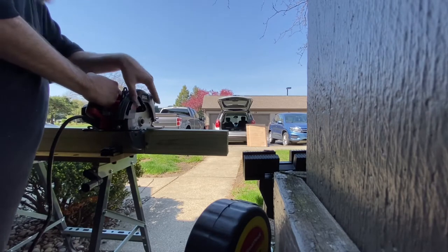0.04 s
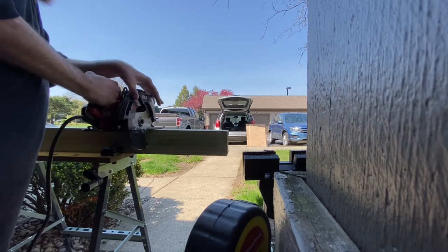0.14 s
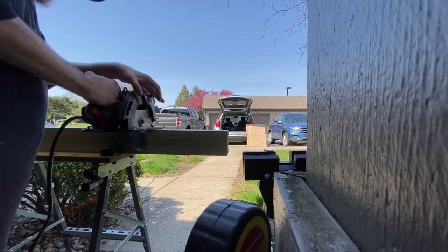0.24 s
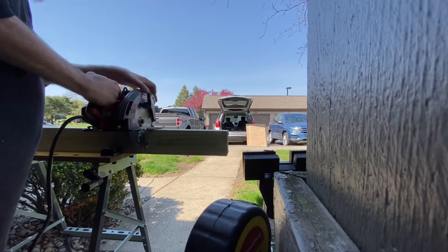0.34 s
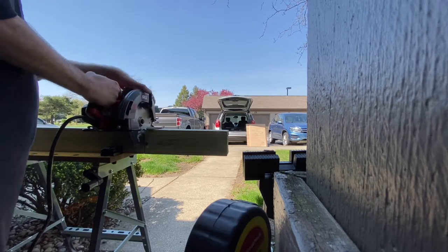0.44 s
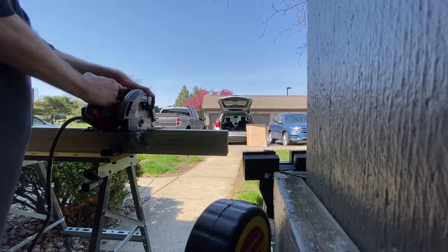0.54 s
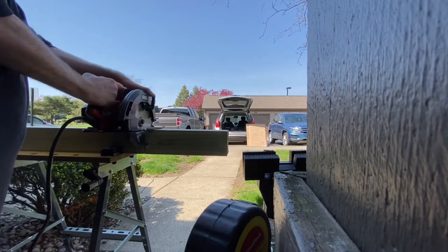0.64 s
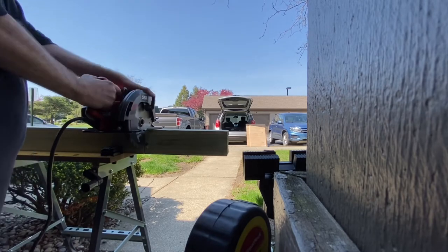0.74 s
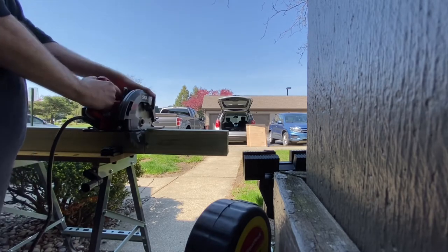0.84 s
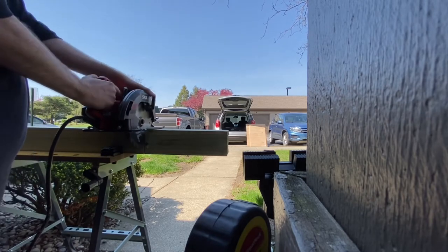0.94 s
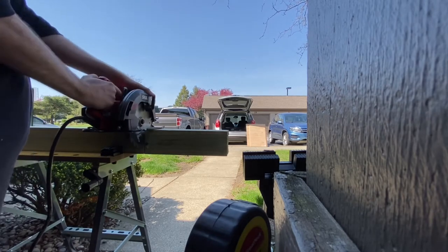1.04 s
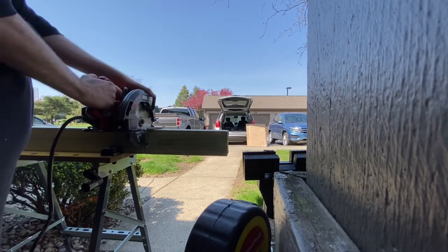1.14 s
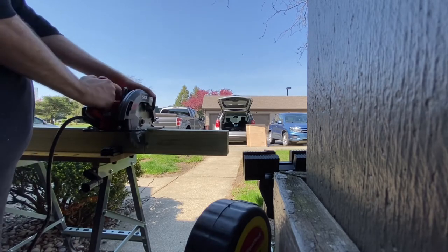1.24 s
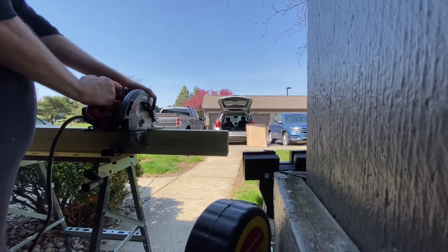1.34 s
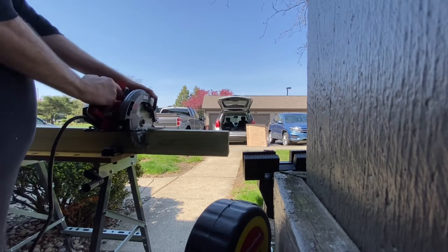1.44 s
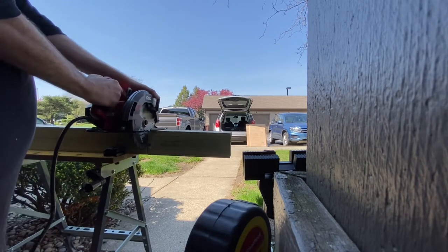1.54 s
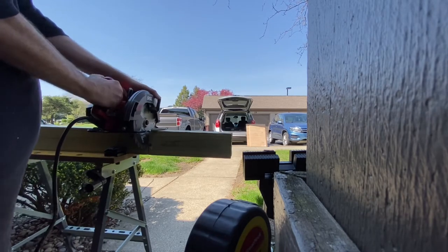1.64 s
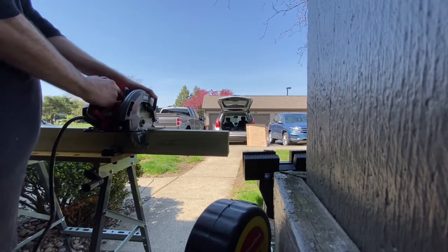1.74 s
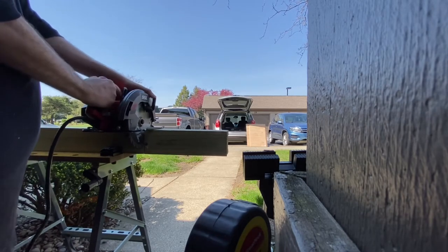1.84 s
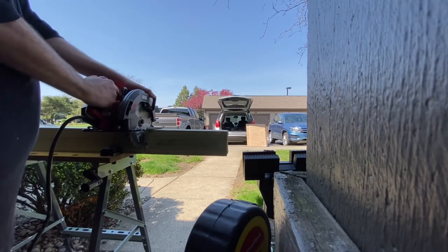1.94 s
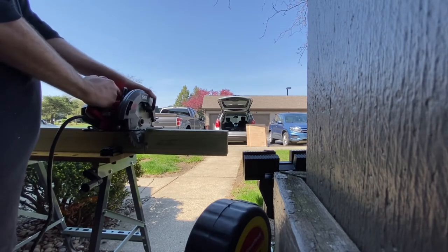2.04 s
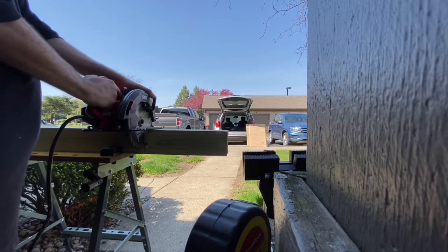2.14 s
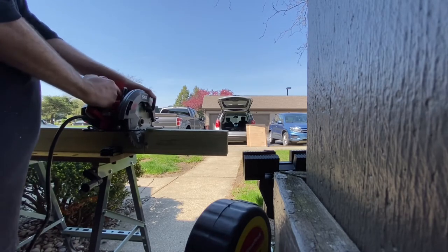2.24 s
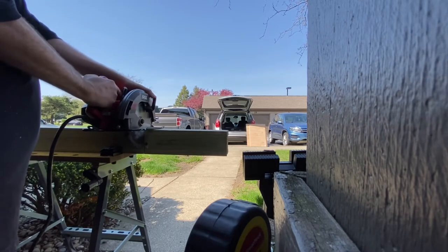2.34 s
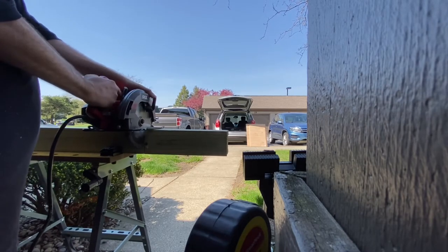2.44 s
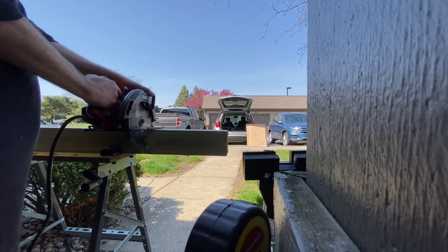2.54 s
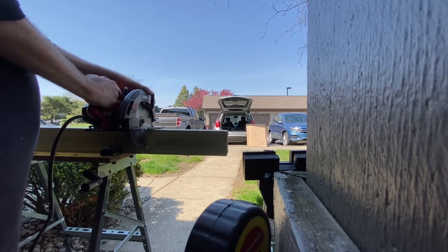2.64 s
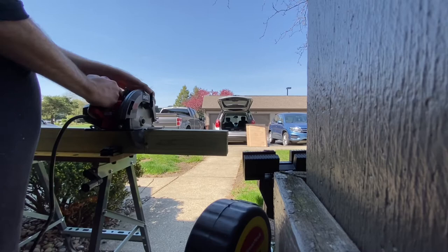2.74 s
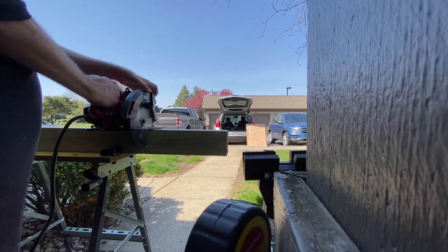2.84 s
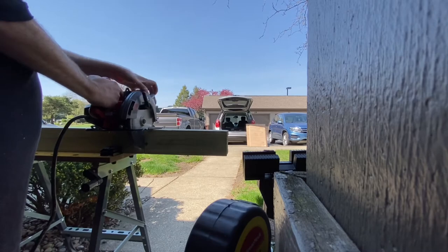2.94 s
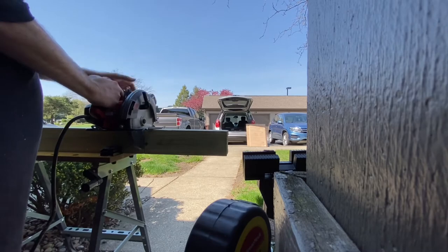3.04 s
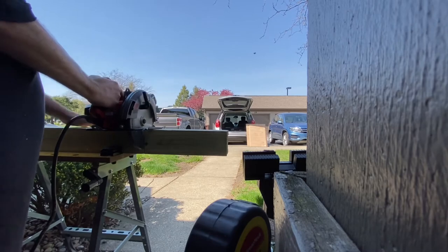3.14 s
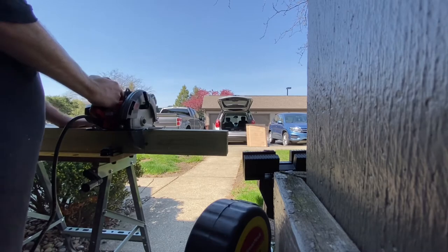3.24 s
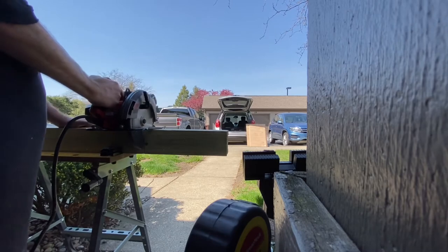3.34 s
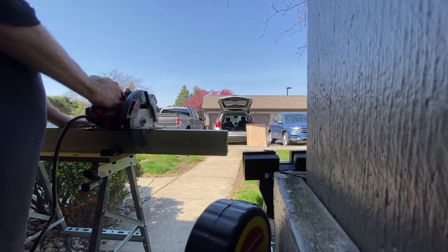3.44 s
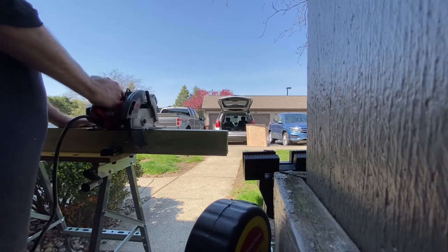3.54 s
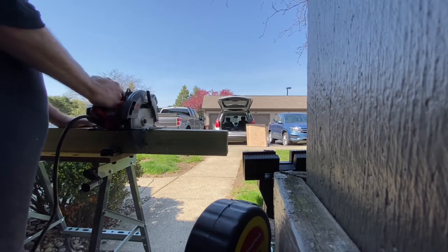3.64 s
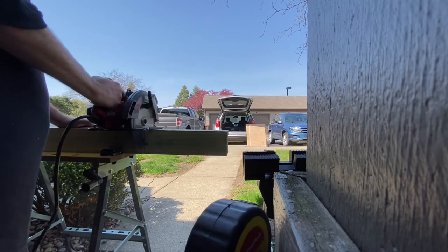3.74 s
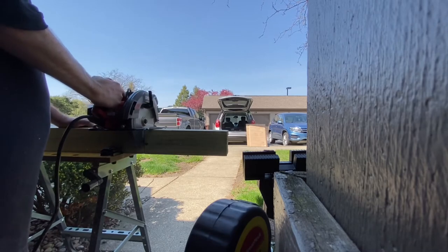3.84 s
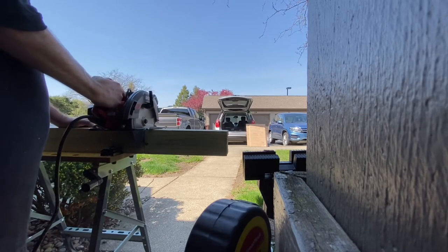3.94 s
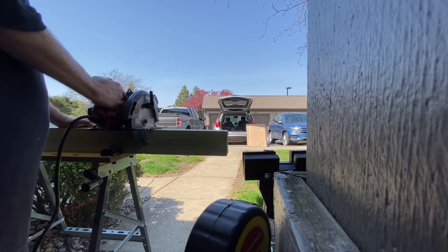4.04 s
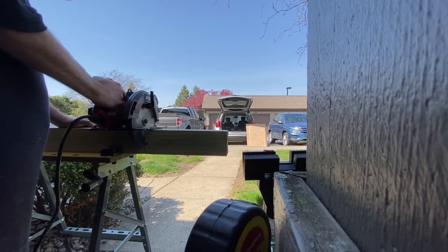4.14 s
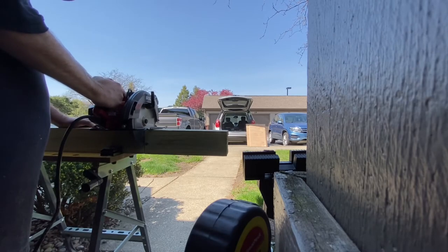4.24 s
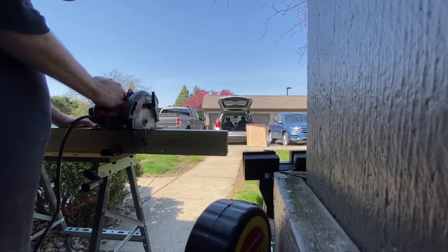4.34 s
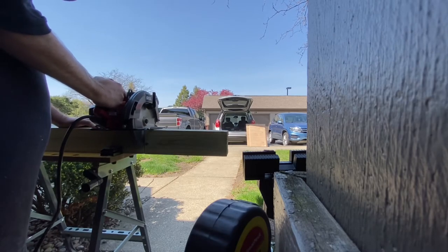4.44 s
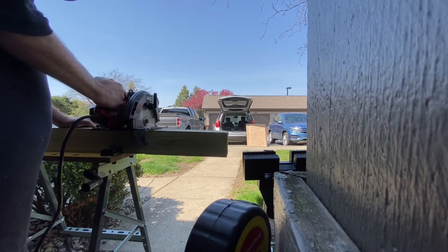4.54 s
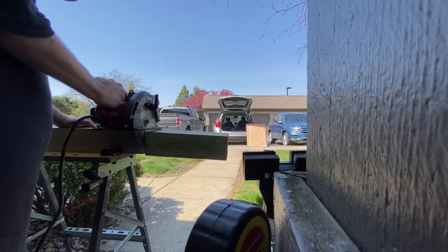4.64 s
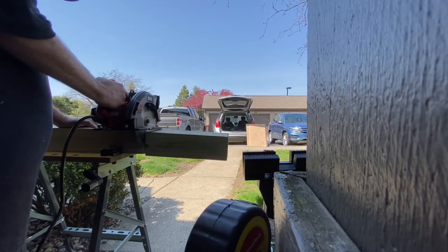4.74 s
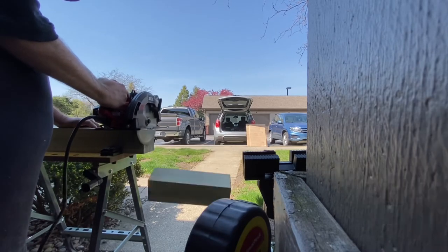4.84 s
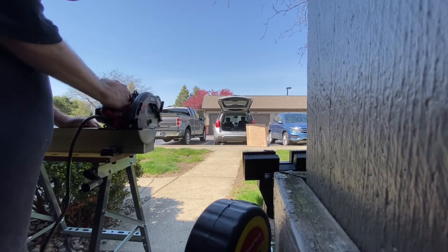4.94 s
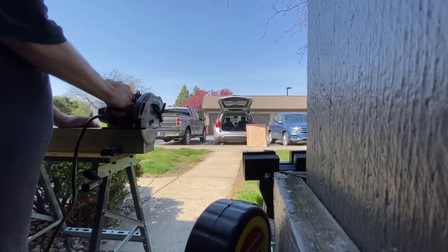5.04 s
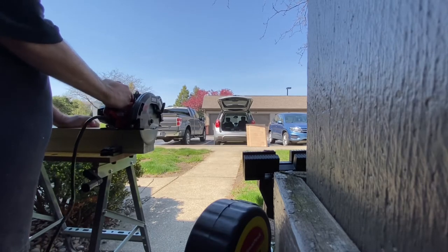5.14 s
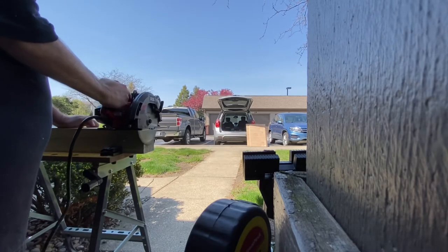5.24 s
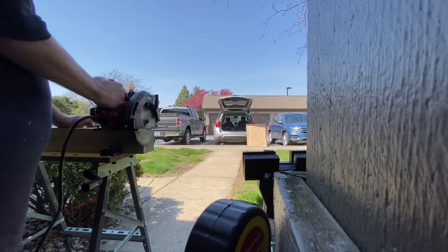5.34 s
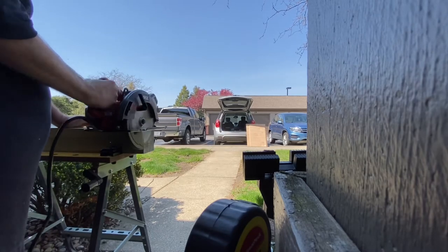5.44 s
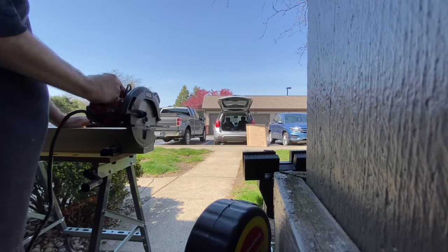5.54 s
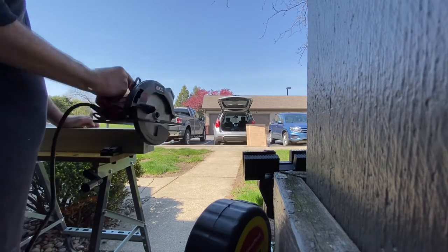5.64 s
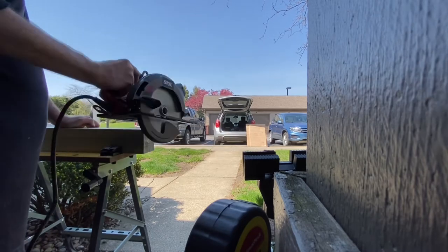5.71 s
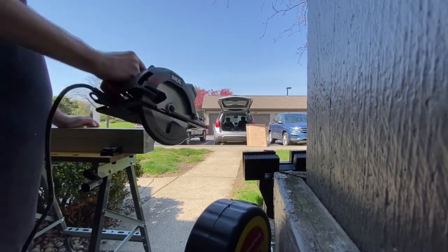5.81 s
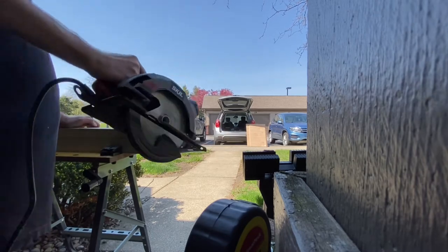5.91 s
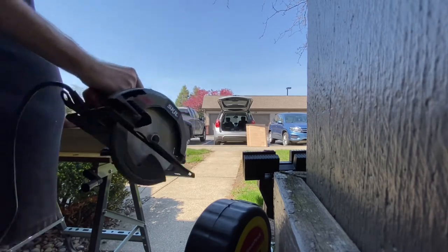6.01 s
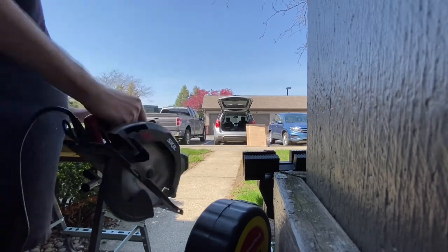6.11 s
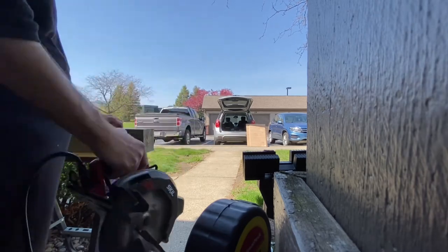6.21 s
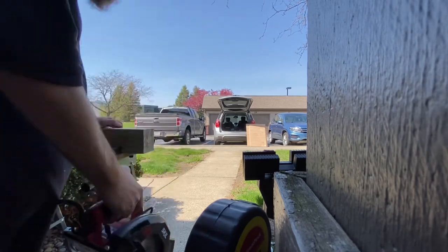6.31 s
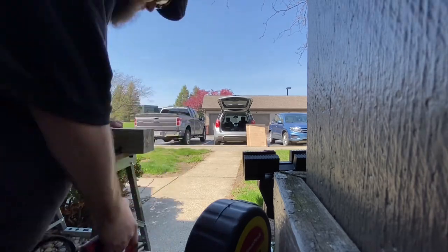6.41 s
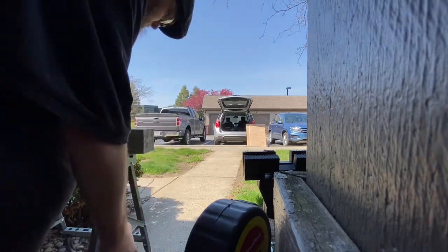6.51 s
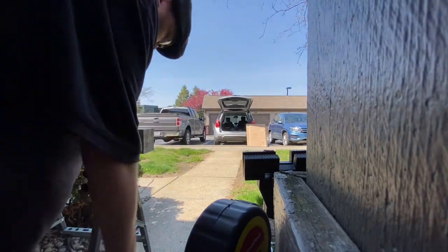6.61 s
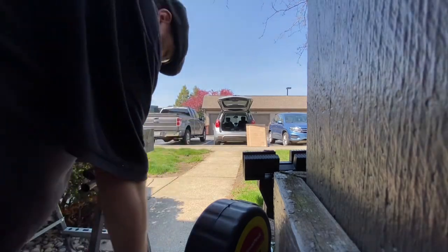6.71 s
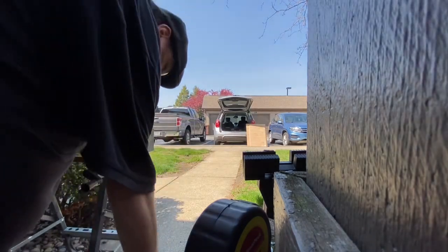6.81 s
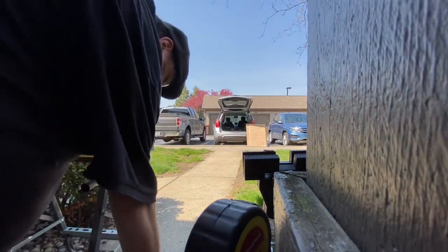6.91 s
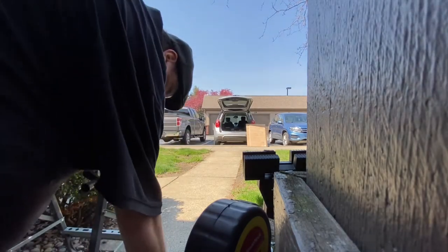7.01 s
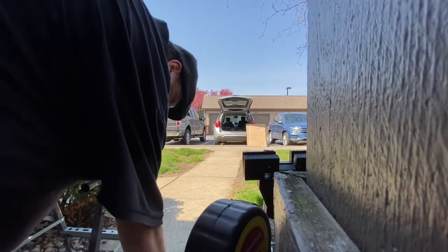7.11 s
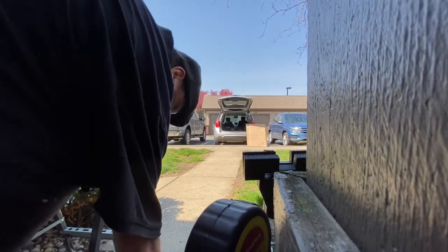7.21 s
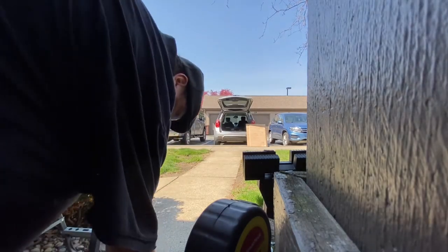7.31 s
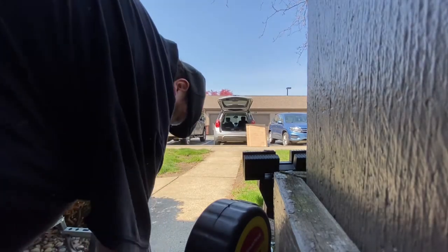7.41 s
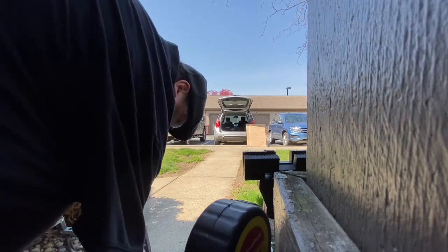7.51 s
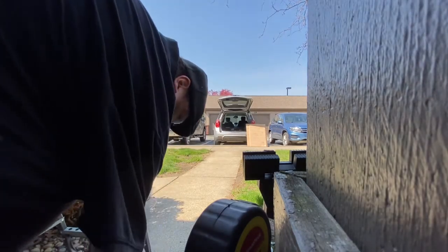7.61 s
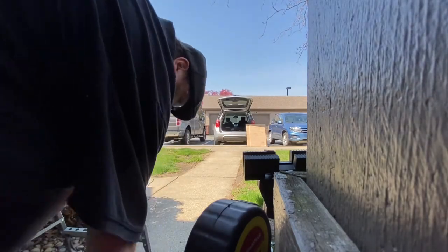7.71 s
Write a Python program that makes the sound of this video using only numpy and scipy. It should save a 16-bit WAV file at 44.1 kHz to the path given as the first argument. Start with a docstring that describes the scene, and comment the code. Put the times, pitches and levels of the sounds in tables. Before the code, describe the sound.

Outside beside a wall, soft distant traffic and a faint machine hum, with two tiny knocks. A close circular saw clicks on with a harsh gear groan, screams up to speed, then drops in pitch slightly as it cuts a board. The end breaks off with a woody crack, the motor is released and its whine glides down. The saw is set lower, and small ringing knocks follow. Stereo microphone nearby.

```python
"""Outdoors, distant traffic noise and a machine hum waver, with passing tones and two faint knocks.
At 2.1 s a circular saw clicks on and groans up to speed by a wall; the background sinks, then creeps back.
It cuts a board from about 3 to 4.5 s; the cut end breaks off at 4.8 s and the saw coasts down.
Sine families at multiples of the armature speed make its whine; filtered noise makes its roar and hiss.
At 6.1 s it is set aside and its direction changes; short ringing knocks follow from 7.2 s."""
import sys
import numpy as np
from scipy import signal
from scipy.fft import rfft, irfft, next_fast_len
from scipy.io import wavfile

SR = 44100
rng = np.random.default_rng(int(sys.argv[2]) if len(sys.argv) > 2 else 0)


def master_out(mix):
    """Clip the mix to full scale and print it as 16-bit PCM to the path in sys.argv[1]."""
    frames = np.transpose(np.atleast_2d(mix))
    ceiling = np.clip(frames, -1, 1)
    pcm = np.round(ceiling * 32767).astype(np.int16)
    wavfile.write(sys.argv[1], SR, pcm)


N = 342657
SIZE = next_fast_len(N)
HZ = np.fft.rfftfreq(SIZE, 1 / SR)   # frequencies of the noise spectra
TIME = np.arange(N) / SR   # seconds
CUTOFF_HZ = 15750   # no whine line is made above this
CUT_START_S, CUT_END_S, CUT_EDGE_S = 2.97, 4.52, 0.18   # blade in the wood; length of entry and exit

# trigger click: (time [s], level [dB], pitch [Hz])
SWITCH = [(2.136, -21, 5770)]
# armature under power, once run up; the last row is the release: (time [s], speed [turns per s])
SPEED = [(2.134, 411), (2.3, 414), (2.4, 430), (2.5, 443.5), (2.62, 450.5), (3.05, 484.5), (3.2, 486),
         (3.35, 481), (3.5, 470), (3.65, 466.5), (4.3, 467.5), (4.55, 471), (4.7, 482.5), (4.867, 493)]
# resonances of the blade guard: (frequency [Hz], width [Hz], level [dB])
GUARD_MODES = [(2280, 110, -2.5), (2448, 155, -3.5), (2895, 76, -7.5)]


def from_db(db):
    """Decibels to gain."""
    return 10 ** (np.asarray(db) / 20)


def rms_one(x):
    """Scale to an rms (average strength) of 1."""
    return x / np.sqrt(np.mean(x ** 2) + 1e-20)


def in_time(rows, before=None):
    """Turn each column of a time table into a curve with one value per sample."""
    s, *columns = np.transpose(rows)
    return [np.interp(TIME, s, column, left=before) for column in columns]


def at_hz(points, hz):
    """Read a spectrum table on a log-frequency axis."""
    f, value = np.transpose(points)
    return np.interp(np.log(hz + 1), np.log(f + 1), value)


def bump(centre_s, length_s):
    """A smooth hill in time with a top of 1."""
    return np.exp(-((TIME - centre_s) / length_s) ** 2)


def drift(rate):
    """Random wander of spread 1: noise smoothed twice at the rate [Hz], made at every 20th sample."""
    r = np.exp(-40 * np.pi * rate / SR)
    noise = rng.standard_normal(N // 20 + 2002)
    slow = signal.lfilter([1], [1, -2 * r, r * r], noise)[2000:]   # skip the filter's start
    return np.interp(np.arange(N) / 20, np.arange(len(slow)), rms_one(slow))


def coloured(spectrum_db):
    """Three unrelated noises of one spectrum, with a joint rms of 1: direct, scattered left and right."""
    white = rfft(rng.standard_normal((3, SIZE)))
    return rms_one(irfft(white * from_db(spectrum_db), SIZE)[:, :N])


def echoed(x):
    """A tone as three rows: direct, and its later, weaker wall echo on each side."""
    echo_s, echo_db = (.0031, .0047), -4   # left and right delay
    return np.array([x] + [from_db(echo_db) * np.roll(x, round(s * SR)) for s in echo_s])


def ping(events, cycles, rattle, crack):
    """Each event rings at its pitch with noise near it and bright noise, fading 60 dB in so many cycles."""
    length = 5000   # samples; every ring stops here
    out, t = np.zeros(N), np.arange(length) / SR
    grit = rng.standard_normal((len(events), length))
    for (s, db, hz), noise in zip(events, grit):
        at = round(s * SR)
        attack = 1 - np.exp(-3.0 * t * hz)
        shape = from_db(db - 60 * t * hz / cycles) * attack
        near = rms_one(signal.lfilter(*signal.iirpeak(hz, 3.0, fs=SR), noise))
        out[at:at + length] += shape * (np.sin(2 * np.pi * hz * t) + rattle * near + crack * noise)
    return out


def microphones(x, lead, pan, diffuse):
    """Two microphones hear the direct row with phase and level offsets, plus their own scattered row."""
    direct, *scattered = rfft(x, SIZE)
    wet = from_db(at_hz(diffuse, HZ))
    side = np.array([[.5], [-.5]])   # each side takes half of the offset
    turned = direct * np.exp(1j * side * np.interp(HZ, *np.transpose(lead)))
    mixed = (turned + wet * np.array(scattered)) / np.sqrt(1 + wet ** 2)
    return irfft(from_db(side * at_hz(pan, HZ)) * mixed, SIZE)[:, :N]


def background_db():
    """The background level sinks once the saw has started, then creeps back."""
    start_db, sunk_db, sink_s, sink_time_s, creep_db_per_s = -44, -67, 2.15, 0.26, 1
    since = np.maximum(TIME - sink_s, 0)
    change_db = sunk_db - start_db + creep_db_per_s * since
    return start_db + change_db * (1 - np.exp(-since / sink_time_s))


def traffic(level_db):
    """Distant traffic: noise of a fixed spectrum whose level wanders slightly."""
    # traffic spectrum: (frequency [Hz], level [dB per Hz])
    traffic_spectrum = [(18, -64), (30, -49), (112, 1), (194, -1), (364, -11), (449, -10), (649, -15),
                        (1250, -6.5), (1590, -23.5), (1960, -16), (4530, -29.5), (6210, -26.5), (7270, -32),
                        (8740, -32.5), (16000, -39.5)]
    low = (HZ > 70) & (HZ < 300)
    gain = from_db(at_hz(traffic_spectrum, HZ))
    share = np.sqrt(np.sum(gain ** 2) / np.sum(gain[low] ** 2))   # the level is that of the bass
    return share * from_db(level_db + .7 * drift(5)) * coloured(at_hz(traffic_spectrum, HZ))


def passing_tones():
    """Sine tones in the background swell and pass while their pitch wavers."""
    # passing tones: (time [s], length [s], frequency [Hz], level [dB])
    passing = [(.2, 0.31, 188, -44.5), (.65, 0.2, 128.2, -47.5), (1.403, 0.35, 207, -47.5),
               (1.45, .22, 6298, -60)]
    tones = 0
    for s, length, hz, db in passing:
        level = from_db(db + 2 * drift(8.4)) * bump(s, length)
        tones = tones + level * np.sin(2 * np.pi * hz * TIME + 2 * drift(4.4))
    return np.sqrt(2) * echoed(tones)


def machine_hum(level_db):
    """Steady machine tones that share one phase waver, each with its own level wander."""
    # hum tones: (frequency [Hz], level [dB] before a common trim)
    hum_tones = [(468.3, -62), (699.8, -58), (759.0, -60), (818.3, -60), (872.1, -59), (1066, -64),
                 (1217, -60), (2008, -73), (2449, -74), (2681, -71), (2912, -76), (3031, -68), (4081, -72),
                 (4199, -80), (5480, -78), (5830, -81), (6062, -77), (6180, -78), (6293, -70), (6530, -80),
                 (6643, -81), (6880, -77), (6993, -81), (7930, -84), (8511, -74), (8742, -81)]
    waver = drift(2.7)
    tones = 0
    for hz, db in hum_tones:
        level = from_db(db - 1.0 + 3.7 * drift(1.4))
        tones = tones + level * np.sin(2 * np.pi * hz * TIME + waver)
    return np.sqrt(2) * tones * from_db(level_db - level_db[0])


def handling():
    """Small knocks of the tool being handled ring briefly, mixed with noise."""
    # knocks: (time [s], level [dB], pitch [Hz])
    knocks = [(0.5794, -45, 6300), (1.2394, -44, 5000), (7.222, -31, 4280), (7.2404, -39, 4510),
              (7.27, -47, 5070), (7.2814, -38, 4080), (7.2908, -33, 4800), (7.464, -40, 4000)]
    return ping(knocks, cycles=50.0, rattle=.6, crack=.3)


def cutting():
    """0 in the air, 1 in the wood, with ramps at entry and exit."""
    inside_s = np.minimum(TIME - CUT_START_S, CUT_END_S - TIME)
    return np.clip(inside_s / CUT_EDGE_S + .5, 0, 1)


def board():
    """The board hums under the blade with a rising pitch; then its cut end breaks off and knocks once more."""
    # break and knock: (time [s], level [dB], pitch [Hz])
    offcut = [(4.8408, -22, 900), (4.8425, -18.5, 480), (4.846, -33, 210), (4.854, -30, 640),
              (4.858, -38, 140), (4.936, -36, 700)]
    thrum_db, thrum_hz, rise_hz_per_s = -61, 128.5, 3.2
    pitch = thrum_hz + rise_hz_per_s * (TIME - CUT_START_S)
    phase = 2 * np.pi * np.cumsum(pitch) / SR + 0.2 * drift(3)
    level = cutting() ** 2 * from_db(thrum_db + 2.1 * drift(3.0))
    snap = ping(offcut, cycles=7.0, rattle=.2, crack=.03)
    high_pass = signal.butter(2, 100, "high", fs=SR, output="sos")
    return np.sqrt(2) * level * np.sin(phase) + signal.sosfilt(high_pass, snap + 1e-18)


def speed():
    """Armature turns per second: it runs up, sags in the wood, then friction and the fan slow it."""
    run_up_s = .07
    friction, viscous, fan = 42.5, .388, 4.56e-6   # loss in turns per s2: steady, per speed, per speed cubed
    start, (release, top) = SPEED[0][0], SPEED[-1]
    powered = in_time(SPEED)[0] * (1 - np.exp(-np.maximum(TIME - start, 0) / run_up_s))
    falling = np.linspace(top, 1, 4000)
    loss = friction + viscous * falling + fan * falling ** 3
    elapsed = np.cumsum((top - 1) / 4000 / loss)   # time taken to fall to each speed
    coasting = np.interp(TIME - release, elapsed, falling)
    return np.where(TIME < release, np.maximum(powered, 20), coasting)


def by_state(free_db, wood_db, coast_db):
    """A level that depends on whether the saw runs free, cuts or coasts."""
    coasting = np.clip((TIME - SPEED[-1][0]) / 0.47, 0, 1)
    return free_db + (wood_db - free_db) * cutting() + (coast_db - free_db) * coasting


def noise_levels():
    """Levels of the casing roar and the air hiss, with brief swells; near silence before the start."""
    # saw noise: (time [s], roar level [dB], hiss level [dB])
    noise_rows = [(2.135, -35, -32.5), (2.18, -21.5, -22.5), (2.43, -27, -24.5), (2.62, -29, -27.5),
                  (3.01, -28.5, -28), (3.53, -32.5, -30), (4.3, -32.5, -31), (4.86, -33, -29),
                  (5.0, -35.5, -36), (5.18, -38.5, -36.5), (5.4, -38.5, -40.5), (5.75, -40, -41),
                  (6.1, -43.5, -49.5), (6.35, -48, -56), (6.7, -55.5, -59), (7.0, -60, -61.5),
                  (7.35, -65.5, -61), (7.77, -65.5, -68)]
    # brief swells: (time [s], length [s], roar boost [dB], hiss boost [dB])
    swells = [(3.31, 0.12, 3, 3.5), (4.493, 0.15, 1, 1.5), (5.049, 0.028, 2.5, 3), (5.278, 0.054, 3.5, 2.5),
              (5.74, 0.023, 0, 2), (7.232, 0.013, 9.5, 1), (7.278, 0.033, 3, 6)]
    roar_db, hiss_db = in_time(noise_rows, before=-150)
    for s, length, roar_boost, hiss_boost in swells:
        roar_db = roar_db + roar_boost * bump(s, length)
        hiss_db = hiss_db + hiss_boost * bump(s, length)
    return roar_db, hiss_db


def casing_db(hz):
    """Casing and blade resonances boost or weaken the sound near their own frequencies."""
    # resonances: (frequency [Hz], width [Hz], boost [dB])
    casing = [(238, 12, 9.5), (432, 22, 8), (608, 25, 8.5), (1059, 14, 7), (1249, 98, 11), (1784, 125, 10),
              (2030, 87, -6), (2452, 40, 10), (2755, 40, 6.5), (3110, 89, 7), (3435, 40, 10),
              (3770, 450, -3), (4880, 200, 7), (5215, 70, 5), (5580, 80, -4), (5960, 390, -2),
              (8300, 180, 0), (10630, 860, 3), (12550, 74, 6)]
    return sum(db / (1 + (2 * (hz - centre) / width) ** 2) for centre, width, db in casing)


def gliding_casing_db(hz):
    """Casing boost along a changing pitch, worked out at every 32nd sample."""
    return np.repeat(casing_db(hz[::32]), 32)[:N]


def guard_lift_db(hz):
    """Gear lines swell as they pass the guard modes."""
    lift_db, spread = 17, .75   # reach in mode widths
    near = sum(from_db(lift_db + db) / (1 + ((hz - f) / (spread * width)) ** 2)
               for f, width, db in GUARD_MODES)
    return 20 * np.log10(1 + near)


def whine(turns, lead, lead_db, others, wobble_db):
    """Rough sine lines at multiples of the speed; the weaker ones swell as they glide through the casing."""
    phase = 2 * np.pi * np.cumsum(turns) / SR
    source_db = lead_db - gliding_casing_db(lead * turns)   # so the lead ends up at lead_db
    out = 0
    for multiple, db in [(lead, 0)] + others:
        hz = multiple * turns
        line_db = source_db + db + gliding_casing_db(hz)
        level = from_db(line_db + wobble_db * (drift(19.0) + drift(78))) * (hz < CUTOFF_HZ)
        blur = (.3 + multiple / 140) * drift(40)   # uneven teeth widen the high orders most
        out = out + np.sqrt(2) * level * np.sin(multiple * phase + blur)
    return out


def unbalance(turns, roar_db):
    """The unbalance drones twice per turn."""
    # drone: (time [s], level [dB] over the roar)
    drone_level = [(2.2, -30), (2.4, -19), (2.7, -22), (4.9, -21), (5.0, -12), (5.08, -16), (5.2, -32),
                   (6.0, -50)]
    return whine(turns, 2, roar_db + in_time(drone_level)[0], [], wobble_db=1.5)


def tooth_whine(turns, roar_db):
    """Tooth lines change level between running free, cutting and coasting."""
    # weaker lines: (multiple of the armature speed, level [dB] against the lead)
    tooth_lines = [(5.6, -6), (7, -9), (8.4, -1), (11.2, -5), (16.8, -2), (33.6, -6)]
    level_db = roar_db + by_state(-17, -12.5, -36)
    return whine(turns, 4, level_db, tooth_lines, wobble_db=2.5)


def gear_whine(turns, roar_db):
    """The gear mesh and its overtone whine, swelling in the guard; wheel run-out splits the mesh tone."""
    # mesh tone: (time [s], level [dB] over the roar, before the guard's lift)
    mesh_level = [(2.15, -14), (2.3, -12), (2.38, -8), (2.45, -11), (2.53, -9), (2.6, -23), (3.0, -22),
                  (3.6, -17), (4.5, -17), (4.86, -23), (5.5, -12)]
    # weaker lines of both families: (multiple of the armature speed, level [dB] against the lead)
    mesh_lines = [(13.3, -12), (13.65, -4), (14.35, -5), (14.7, -12)]
    overtone_lines = [(26, -12), (27.65, -5), (28.35, -7)]
    overtone_lift = 1.42   # the overtone excites the guard more than the mesh tone
    mesh_db = roar_db + in_time(mesh_level)[0] + guard_lift_db(14 * turns)
    overtone_db = roar_db + by_state(-25, -22, -14) + overtone_lift * guard_lift_db(28 * turns)
    mesh = whine(turns, 14, mesh_db, mesh_lines, wobble_db=2.2)
    return mesh + whine(turns, 28, overtone_db, overtone_lines, wobble_db=2.4)


def high_order_whine(turns, hiss_db):
    """High gear and brush orders grow against the hiss as the saw slows, then fade near standstill."""
    # weaker lines: (multiple of the armature speed, level [dB] against order 42)
    high_lines = [(48, -9), (56, -8), (70, -14)]
    # the highest lines, some alone and some close together:
    # (multiple of the armature speed, level [dB] against order 140)
    top_lines = [(96, 1), (98, 0), (112, -3), (126, -4), (144, -1), (166, -2), (168, 0), (170, -2),
                 (182, -3)]
    db_per_octave, full_speed = -9, 85   # they grow down to this many turns per s
    fade_s, fade_db_per_s = 7.2, 40
    octaves_above = np.log2(np.maximum(turns / full_speed, 1))
    fade_db = fade_db_per_s * np.maximum(TIME - fade_s, 0)
    slowed_db = hiss_db + db_per_octave * octaves_above - fade_db
    high = whine(turns, 42, slowed_db - 3.5, high_lines, wobble_db=2)
    return high + whine(turns, 140, slowed_db - 19, top_lines, wobble_db=2)


def commutator_whine(turns, roar_db):
    """The commutator whines around 30 times the armature speed and at its double."""
    # leading line: (time [s], level [dB] over the roar)
    commutator_level = [(2.2, -9), (2.45, -5.5), (2.7, -11.5), (2.95, -11), (3.2, -8), (3.7, -6),
                        (4.3, -10), (4.8, -3.5), (5.0, -7), (5.25, -5), (5.6, -8), (5.95, -8.5), (6.12, -4),
                        (6.3, -7), (6.7, -7), (7.0, -14)]
    # weaker lines: (multiple of the armature speed, level [dB] against the lead)
    commutator_lines = [(29.3, -14), (30.7, -12), (60, -20)]
    return whine(turns, 30, roar_db + in_time(commutator_level)[0], commutator_lines, wobble_db=1.7)


def gear_groan():
    """The gears groan under the starting torque: a noise band that rises, holds and fades."""
    # groan spectrum: (frequency [Hz], level [dB per Hz])
    strain_band = [(1500, -51), (2150, -1), (2500, -3), (3200, 1.5), (3700, -20), (4450, -22), (4750, -8),
                   (5100, -24), (6000, -54)]
    held_db, attack_s, hold_s, fade_db_per_s = -23.5, 0.03, 0.12, 48
    since = np.maximum(TIME - SWITCH[0][0], 1e-6)
    rise_db = 40 * np.log10(np.minimum(since / attack_s, 1))
    fade_db = fade_db_per_s * np.maximum(since - attack_s - hold_s, 0)
    level_db = held_db + rise_db - fade_db
    return from_db(level_db + 0.82 * drift(53)) * coloured(at_hz(strain_band, HZ) + casing_db(HZ))


def guard_ring(turns, roar_db):
    """Throbbing noise in the guard modes, strongest while a gear order passes the middle one."""
    # drive: (multiple of the armature speed, level [dB] added to the roar's)
    guard_drive = [(14, 5.5), (28, 3), (42, 0), (56, -4)]
    reach_hz, centre = 250, GUARD_MODES[1][0]
    drive = sum(from_db(db) / (1 + ((order * turns - centre) / reach_hz) ** 2)
                for order, db in guard_drive)
    modes = sum(from_db(2 * db) / (1 + (2 * (HZ - hz) / width) ** 2) ** 2
                for hz, width, db in GUARD_MODES)   # power
    return drive * from_db(roar_db + 2.5 * drift(45)) * coloured(10 * np.log10(modes))


def casing_roar(roar_db, chatter_db):
    """The casing roars: noise through its resonances, shaken by the gear play."""
    # roar spectrum: (frequency [Hz], level [dB per Hz])
    roar_spectrum = [(150, -45), (250, -24.5), (289, -27), (879, -9), (1250, -7), (1410, -5), (1820, -4.5),
                     (2050, -1), (2400, -2), (4500, -4.5), (5850, -38), (9900, -120)]
    noise = coloured(at_hz(roar_spectrum, HZ) + 0.86 * casing_db(HZ))
    return from_db(roar_db + chatter_db + 0.72 * drift(36)) * noise


def dulled(x, turns):
    """A low-pass whose edge follows the fan speed, the level kept."""
    edge_multiple, slope = 31, 2.7   # edge over armature speed; gain falls as frequency to this power
    hz, s, frames = signal.stft(x, SR, nperseg=512)
    edge = edge_multiple * np.interp(s, TIME, turns)
    gain = (1 + (hz[:, None] / edge) ** 6) ** (-slope / 6)
    power = np.mean(abs(frames[0]) ** 2, axis=1, keepdims=True)
    gain = gain / np.sqrt(np.sum(power * gain ** 2, axis=0) / np.sum(power))
    return signal.istft(frames * gain, SR, nperseg=512)[1][:, :N]


def air_hiss(turns, hiss_db, chatter_db):
    """Cooling air hisses: noise that dulls as the fan slows and flutters once in two turns."""
    # hiss spectrum: (frequency [Hz], level [dB per Hz])
    hiss_spectrum = [(2240, -38), (3800, -5.5), (4800, -7), (6690, -0.5), (7450, -2.5), (10100, -3),
                     (12700, -4), (14100, -1), (15000, -2), (16000, -2.5)]
    noise = coloured(at_hz(hiss_spectrum, HZ) + 0.86 * casing_db(HZ))
    air = dulled(noise, np.maximum(turns, 190.))
    flutter = 1 + .14 * np.sin(np.pi * np.cumsum(turns) / SR)
    return from_db(hiss_db + 0.65 * chatter_db + 0.73 * drift(26.8)) * air * flutter


def saw():
    """Tonal part with the trigger click, and noisy part, silent before the trigger."""
    turns = speed()
    roar_db, hiss_db = noise_levels()
    lines = unbalance(turns, roar_db) + tooth_whine(turns, roar_db) + gear_whine(turns, roar_db)
    lines += high_order_whine(turns, hiss_db) + commutator_whine(turns, roar_db)
    click = ping(SWITCH, cycles=900.0, rattle=.2, crack=0.1)
    chatter_db = 0.57 * drift(19.0) + 0.2 * drift(177)   # gear play shakes the whole tool
    noise = casing_roar(roar_db, chatter_db) + air_hiss(turns, hiss_db, chatter_db)
    noise += gear_groan() + guard_ring(turns, roar_db)
    return lines + click, noise * (TIME > SWITCH[0][0])


def scene():
    """Place the street, the board and the saw; the saw sounds from the bench, then from lower down."""
    # phase between the microphones, per direction: (frequency [Hz], left leads by [radians])
    street_lead = [(0, 0), (860, -0.9), (2150, -4.8), (4050, -8.6), (5600, -3.7), (6120, -3.8), (6890, 0.5),
                   (8530, -0.1), (8790, -1.0), (10200, -3.5), (12200, 0.6), (13600, -0.2), (14600, 3.2),
                   (16200, 3.4)]
    bench_lead = [(0, 0), (1460, 3.6), (1980, 2.6), (2670, 5.2), (3190, 2.9), (3700, 3.1), (4390, 3.7),
                  (5000, 5.8), (7670, 9.3), (9990, 11.8), (10600, 14.0), (12400, 12.5), (14100, 13.1),
                  (16200, 9.8)]
    ground_lead = [(0, 0), (1380, 3.7), (1810, 2.8), (2330, 4.3), (3960, 3.4), (5680, 6.3), (6550, 8.3),
                   (8440, 9.0), (9990, 13.0), (11400, 12.9), (13800, 12.5), (14800, 13.0), (15300, 15.9),
                   (16200, 15.7)]
    # level between the microphones, per direction: (frequency [Hz], left minus right [dB])
    street_pan = [(60, -6.5), (110, -6.5), (200, -4.5), (380, -4.5), (700, -5.5), (1290, 0.0), (2380, 0.0),
                  (4400, -1.5), (8120, 2.0), (15000, 0.5)]
    bench_pan = [(60, 14), (110, -12), (200, -1), (380, -3), (700, 1.5), (1290, 7), (2380, 6.5),
                 (4400, -1.5), (8120, 1.5), (15000, 1.5)]
    ground_pan = [(60, -1.0), (110, 2), (200, 0), (380, 1), (700, 0), (1290, -5), (2380, 7.5), (4400, -3),
                  (8120, 10), (15000, 11)]
    # scattered sound: (frequency [Hz], level against the direct sound [dB])
    street_diffuse = [(60, -15), (300, -1.5), (1000, -4.5), (4000, 10.5), (15000, -1)]
    saw_diffuse = [(300, 0), (1200, 0), (1600, -7), (2000, -1.5), (3000, -1.5), (8000, 1), (14000, 1.5)]
    lifted_s, lowered_s = 6.1, 6.14   # the saw leaves the bench and is down
    level_db = background_db()
    street = microphones(traffic(level_db) + passing_tones(), street_lead, street_pan, street_diffuse)
    to_the_right = from_db([[-1.5], [1.5]])   # left and right gain
    tones, noise = saw()
    tool = from_db(2.5) * noise + echoed(from_db(2.0) * tones + handling())
    lowered = np.clip((TIME - lifted_s) / (lowered_s - lifted_s), 0, 1)
    bench = microphones(tool * (1 - lowered), bench_lead, bench_pan, saw_diffuse)
    ground = microphones(tool * lowered, ground_lead, ground_pan, saw_diffuse)
    return street + (machine_hum(level_db) + board()) * to_the_right + bench + ground


def record(dry):
    """The microphones lose the deep bass, peaks are rounded, the top is cut."""
    headroom = .8   # rounded peaks stay below this, ahead of the top cut
    bass_cut = signal.butter(3, 50, "high", fs=SR, output="sos")
    top_cut = signal.cheby2(26, 75, CUTOFF_HZ + 120, fs=SR, output="sos")
    thin = signal.sosfilt(bass_cut, dry)
    return signal.sosfilt(top_cut, headroom * np.tanh(thin / headroom))


dry = scene()
out = record(dry)
master_out(out)
```